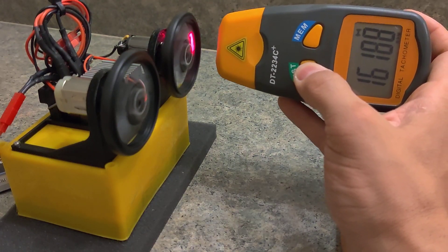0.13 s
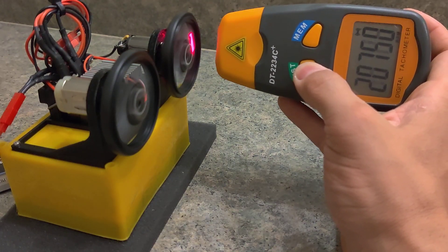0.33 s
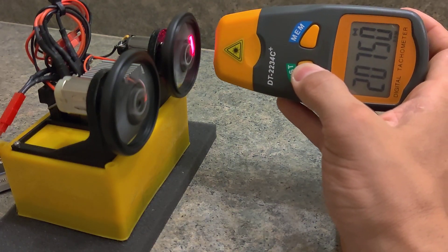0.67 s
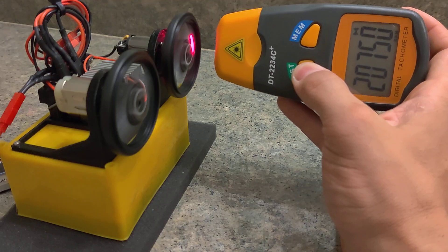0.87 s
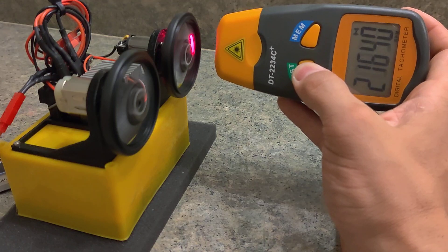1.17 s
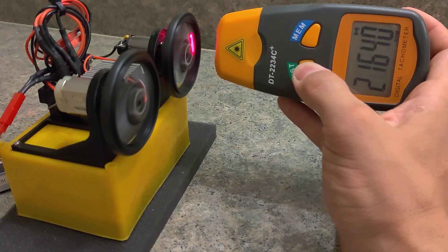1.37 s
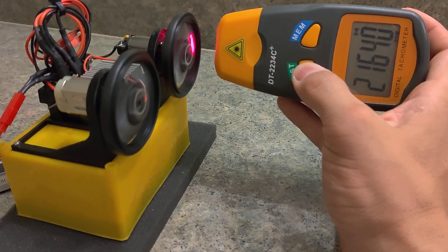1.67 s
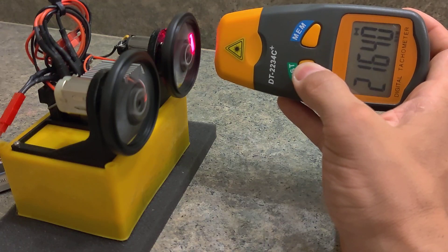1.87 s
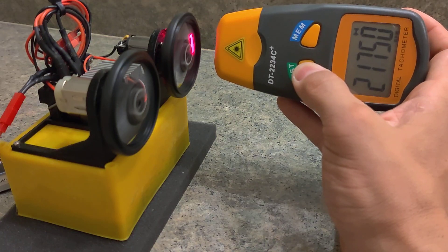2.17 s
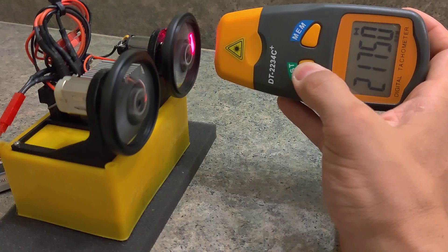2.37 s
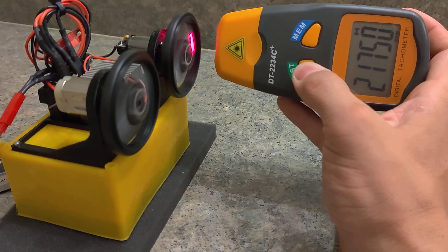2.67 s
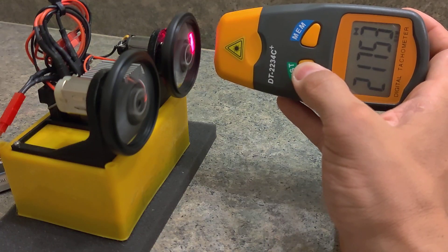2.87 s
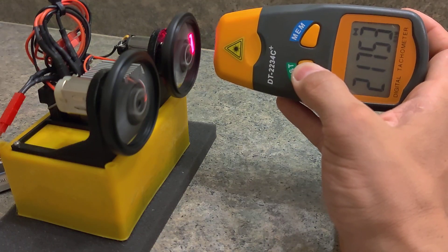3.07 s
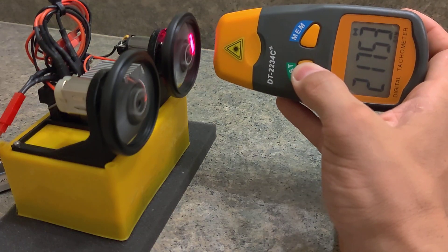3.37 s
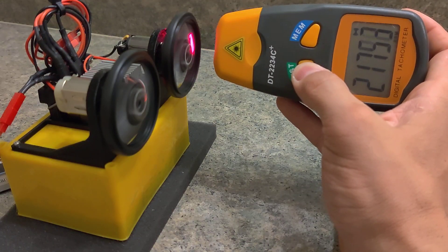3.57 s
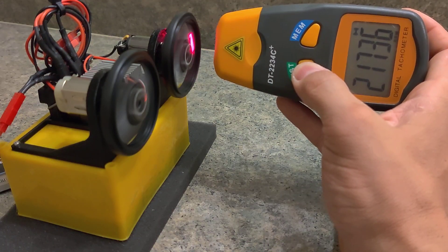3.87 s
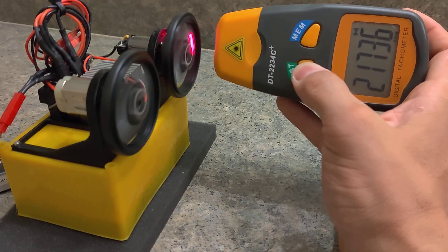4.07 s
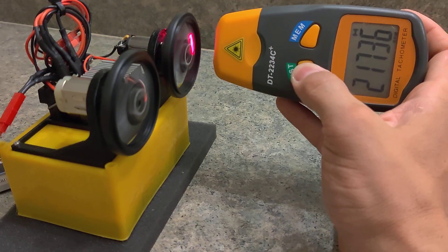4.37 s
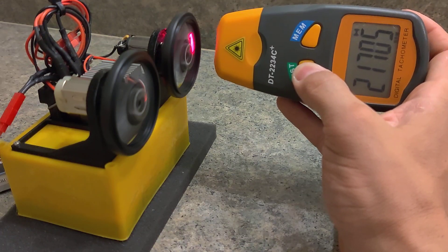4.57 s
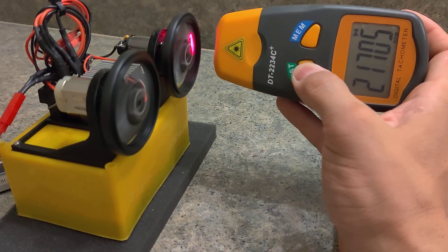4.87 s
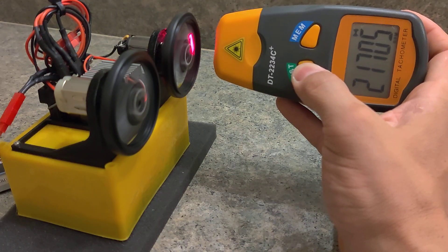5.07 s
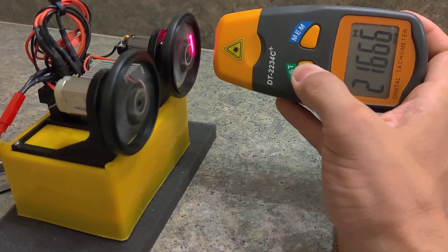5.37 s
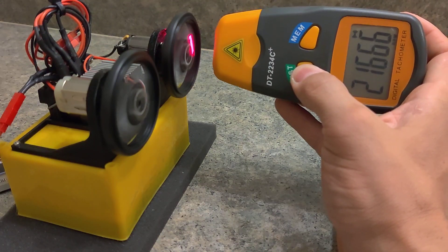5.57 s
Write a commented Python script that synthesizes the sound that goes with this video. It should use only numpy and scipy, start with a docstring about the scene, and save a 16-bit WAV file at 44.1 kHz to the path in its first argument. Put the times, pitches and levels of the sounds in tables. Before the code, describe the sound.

Close stereo microphones on a test bench pick up continuous high-speed spinning: a nasal, buzzing motor hum with fluttering overtones, gentle pulsing and a wide sandy hiss. It settles upward by about half a semitone at the start, then runs evenly for several seconds. Just before the end the motor is released, and the tone starts gliding down and weakening. There is little sense of room echo.

```python
"""Two flywheels on a plastic stand, spun by a small brushed motor at about 360 turns a second, then coasting down.
The unbalanced shaft sings at multiples (orders) of the turning rate, as a sum of cosines.
A second, slower rotation, perhaps the other wheel, beats with them and adds sum and difference tones.
Brushes and bearings hiss and the wheels stir the air, both as shaped noise; a close microphone pair hears it."""
import sys
import numpy as np
from scipy import signal
from scipy.fft import rfft, irfft
from scipy.io import wavfile

SR = 44100
rng = np.random.default_rng(int(sys.argv[2]) if len(sys.argv) > 2 else 0)


def bounce(signal):
    """Save signal as a 16-bit WAV file at the path given by the first command-line argument."""
    frames = np.transpose(np.atleast_2d(signal))
    limited = np.clip(frames, -1, 1)
    pcm = np.round(limited * 32767).astype(np.int16)
    wavfile.write(sys.argv[1], SR, pcm)


N = 252252
T = np.arange(N) / SR
HZ = np.fft.rfftfreq(N, 1 / SR)
EDGE_HZ = 15550  # upper band limit
# the motor closes in on its top speed (turns per second), then sags a little as it runs
TOP_HZ, START_HZ, SPIN_UP_S = 362.7, 350.1, .39
SAG_FROM_S, SAG_HZ_PER_S = 2.7, .74
# switched off, the shaft loses the same share of its speed in every moment
OFF_S, COAST_S = 5.39, 1.48
# once off, the pull on the shaft eases to this share within this time
COAST_PULL, RELEASE_S = .84, .13
# slower rotation, cycles per shaft turn: base value, extra at the start, rise per second during the sag
SLOWER_RATIO, SLOWER_START, SLOWER_CREEP_PER_S = .541, .006, .0022
# levels of the shaft's first four orders and of the slower rotation, away from any resonance
ORDER_DB, SLOWER_DB = [-21.5, -30.5, -40, -41.5], -40.7
# the whine swells gently a few times a second; one crest falls at the given time
THROB_HZ, THROB_CREST_S, THROB_DB = 3.41, 2.22, .68
RING_UP_S = .025  # delay of the resonances behind the pitch
# combination tones: initial shortfall, its decay time, and change of level with no pull at all
BUILD_DB, BUILD_S, UNLOADED_DB = 2, .88, -27


def amp(db):
    """Logarithmic level: decibels to amplitude gain."""
    return 10 ** (np.asarray(db) / 20)


def read(rows, hz):
    """Logarithmic frequency scale: all columns of a table, interpolated along it."""
    f, *columns = np.transpose(rows)
    return np.array([np.interp(np.log(hz + 1), np.log(f + 1), c) for c in columns])


def wander(rate_hz):
    """Low-passed random process of rms 1, with little motion above the given rate."""
    size = 2048
    hz = np.fft.rfftfreq(size, T[-1] / size)
    slow = irfft(rfft(rng.standard_normal(size)) / (1 + (hz / rate_hz) ** 2))
    return np.interp(T, np.linspace(0, T[-1], size), slow / slow.std())


def pair(angle, level, balance_db, lead):
    """Level and phase differences: the left is louder by balance_db and leads by lead radians."""
    left = amp(balance_db / 2) * np.cos(angle + lead / 2)
    right = amp(-balance_db / 2) * np.cos(angle - lead / 2)
    return np.sqrt(2) * level * np.array([left, right])  # level is rms


def shaft_speed():
    """Exponential approach and decay: turns per second in spin-up, slow sag and free coast."""
    spin_up = TOP_HZ - (TOP_HZ - START_HZ) * np.exp(-T / SPIN_UP_S)
    driven = spin_up - SAG_HZ_PER_S * np.maximum(T - SAG_FROM_S, 0)
    return driven * np.exp(-np.maximum(T - OFF_S, 0) / COAST_S)


def slower_ratio():
    """Frequency ratio of the slower rotation to the shaft; its drift changes the pace of the beating."""
    creep = SLOWER_CREEP_PER_S * np.maximum(T - SAG_FROM_S, 0)
    return SLOWER_RATIO + SLOWER_START * np.exp(-T / SPIN_UP_S) + creep


# Peaks and dips of stand and room: centre f/Hz, Gaussian half width f/Hz, level/dB
RESONANCES = [(160, 18, 9), (305, 22, -2.3), (333, 3, -4), (346, 6.3, 5), (357, 2, -2), (360, 1.7, -6.3),
              (640, 14, -3), (709, 40, 4.8), (720, 7, 4.3), (922, 70, 12), (1083, 9, 4.5), (1200, 90, 5),
              (1437, 4, 4)]


def resonance(hz):
    """Resonant transfer: stand and room lift or swallow a tone gliding along this pitch curve."""
    hz = np.interp(T - RING_UP_S, T, hz)
    return amp(sum(db * np.exp(-((hz - centre) / width) ** 2) for centre, width, db in RESONANCES))


def shaft(angle, slower_angle, speed, power):
    """Rotating unbalance: harmonic orders and the slower rotation, swelling where they meet a resonance."""
    throb = amp(THROB_DB * np.cos(2 * np.pi * THROB_HZ * (T - THROB_CREST_S)))
    first, second, third, fourth = (amp(db) * resonance(order * speed) * throb
                                    for order, db in enumerate(ORDER_DB, 1))
    low = amp(SLOWER_DB) * resonance(SLOWER_RATIO * speed)
    # each order has its own jitter of phase (except the first) and of level
    out = pair(angle, first * amp(.29 * wander(35)), balance_db=1 + 4.8 * power, lead=0)
    second_angle = 2 * angle + np.pi / 2 + .028 * wander(25)
    out += pair(second_angle, second * amp(.35 * wander(22)), balance_db=4.0, lead=.3)
    third_angle = 3 * angle + .12 * wander(15)
    out += pair(third_angle, third * amp(2.2 * wander(7.7)), balance_db=-5.5, lead=2.1)
    fourth_angle = 4 * angle + .12 * wander(15)
    out += pair(fourth_angle, fourth * amp(1.5 * wander(14)), balance_db=-1.0, lead=.47)
    return out + pair(slower_angle, low * amp(.84 * wander(14)), balance_db=-1.1, lead=.56)


# Combination tones at shaft order x shaft rate + slower order x slower rate,
# levels under full pull once built up:
# shaft order, slower order, left level/dB, right level/dB, phase lead of the left/rad
PARTIALS = [(1, -1, -48.4, -50.3, -0.1), (0, 2, -40.2, -44.5, 0.4), (2, -1, -44.4, -49.8, 2.4),
            (1, 1, -43.4, -40.4, -2.0), (0, 3, -37.7, -37.1, 0.3), (1, 2, -30.1, -29.9, -0.1),
            (3, -1, -41.0, -37.6, 0.2), (2, 1, -35.8, -43.1, 1.1), (1, 3, -41.5, -40.9, 0.5),
            (4, -2, -44.4, -40.6, 0.7), (4, -1, -46.0, -49.9, 1.1), (3, 1, -49.3, -38.9, 0.5),
            (5, -1, -47.2, -48.8, 1.8), (4, 1, -46.7, -41.5, 3.0), (5, 0, -39.6, -44.3, 2.8),
            (4, 2, -41.6, -43.3, -0.8), (6, -1, -38.7, -40.5, 2.7), (5, 1, -35.1, -34.7, 2.6),
            (6, 0, -39.8, -47.4, 2.3), (6, 1, -44.1, -41.0, -1.3), (5, 3, -42.6, -43.8, -1.7),
            (7, 0, -43.2, -41.6, -2.6), (8, 1, -43.2, -40.5, 2.4), (9, 0, -44.0, -38.6, 2.7),
            (9, 1, -42.4, -46.1, 1.1), (10, 0, -40.7, -46.8, -1.1), (10, 1, -38.7, -39.7, 2.2),
            (13, -2, -40.2, -43.7, -1.2)]


def combination_tones(angle, slower_angle, power):
    """Intermodulation: sums and differences of the two rotations flutter and weaken with the pull."""
    out = np.zeros((2, N))
    for shaft_order, slower_order, left_db, right_db, lead in PARTIALS:
        start = rng.uniform(0, 2 * np.pi)
        phase = shaft_order * angle + slower_order * slower_angle + start + .066 * wander(15)
        level = amp((left_db + right_db) / 2 + .85 * wander(13))
        out += pair(phase, level, left_db - right_db, lead)
    return out * amp(UNLOADED_DB * (1 - power) - BUILD_DB * np.exp(-T / BUILD_S))


# Likeness of the noise at the two sides: f/Hz, correlation coefficient
LIKENESS = [(20, .3), (120, 0.93), (530, 0.88), (800, 0.94), (1300, -0.24), (5000, 0.0044)]


def noise_pair():
    """Partial coherence: spectra of two white noises, alike to a degree set by frequency."""
    left, other = rfft(rng.standard_normal((2, N)))
    same = np.clip(read(LIKENESS, HZ)[0], -1, 1)
    return np.array([left, same * left + np.sqrt(1 - same ** 2) * other])


def treble_share():
    """Power-complementary crossover: the share of power that goes to the hiss, the rest to the air."""
    return 1 / (1 + (1550 / (HZ + 1)) ** 12)


# Air stirred by the wheels, its level at each pitch, before flutter and speed scaling:
# f/Hz, left level/dB per Hz, right level/dB per Hz
AIR = [(20, -66, -70), (70, -70.5, -73), (128, -71, -66), (284, -69.5, -76.5), (364, -59.5, -72),
       (450, -70, -69), (498, -68, -69), (543, -58.5, -68), (714, -64, -54.5), (804, -56, -52.5),
       (970, -57.5, -55.5), (1210, -62, -63), (1520, -70.5, -71.5)]


def stirred_air(noise, relative_speed):
    """Turbulence noise: broadband flow sound that sinks as the wheels slow."""
    spectrum = noise * amp(read(AIR, HZ)) * np.sqrt(1 - treble_share())
    return irfft(spectrum, N) * amp(.73 * wander(11)) * relative_speed ** .36


def scrape(angle, slower_angle):
    """Cyclic roughness under the brushes, repeated each turn, with sidebands at the slower rate."""
    size = 4096  # points around one turn
    orders = np.arange(size // 2 + 1)
    heard = (orders >= 4) & (orders <= 40)
    place = (angle / (2 * np.pi) * size).astype(int) % size
    out = np.zeros((2, N))
    for side in range(-3, 4):  # sideband number
        a, b = rng.standard_normal((2, 2, len(orders)))
        track = np.fft.ifft((a + 1j * b) * heard / (1 + (orders / 17) ** 2), size)
        turn = np.exp(1j * (side * slower_angle + .76 * wander(6.9)))
        out += (track[:, place] * turn).real
    return out / out.std()


# Spectral shape of brushes and bearings, applied to noise and scrape alike:
# f/Hz, left level/dB per Hz, right level/dB per Hz
HISS = [(1630, -56.5, -57.5), (2520, -55.5, -57), (2780, -52, -55.5), (3350, -55, -55), (4600, -54, -53),
        (5820, -51.5, -50.0), (6100, -52, -49), (7250, -58, -55), (7920, -63.5, -60.5), (9280, -56.5, -63),
        (9650, -65, -65.5), (11700, -59, -62), (13600, -59, -59), (14000, -65, -64.5)]


def friction_hiss(noise, angle, slower_angle, relative_speed):
    """Sliding friction: noise and scrape, modulated by contact pressure, sinking as the shaft slows."""
    source = noise * amp(-.62) + amp(-14.5) * rfft(scrape(angle, slower_angle))
    grit = source * amp(read(HISS, HZ)) * np.sqrt(treble_share())
    # the contact keeps shifting, so each region of the hiss flickers on its own
    edges = np.append(np.linspace(0, EDGE_HZ, 9), SR)
    hiss = np.zeros((2, N))
    for lo, hi in zip(edges, edges[1:]):
        hiss += irfft(grit * (HZ >= lo) * (HZ < hi), N) * amp(.94 * wander(20))
    # contact pressure swings with both rotations and their sum, and drifts
    swing = .018 * np.cos(slower_angle) + .015 * np.cos(angle) + .018 * np.cos(angle + slower_angle)
    return hiss * (1 + swing) * amp(.2 * wander(23)) * relative_speed ** .89


def rush(angle, slower_angle, speed):
    """Superposition of stirred air and friction hiss, grown from one noise pair."""
    noise = noise_pair()
    relative_speed = speed / speed.max()
    air = stirred_air(noise, relative_speed)
    hiss = friction_hiss(noise, angle, slower_angle, relative_speed)
    return np.sqrt(SR / 2) * (hiss + air)  # level per Hz to sample amplitude


def scene():
    """Phase as the integral of frequency: one shaft speed sets the pace of everything that turns."""
    speed = shaft_speed()
    power = 1 - (1 - COAST_PULL) * np.clip((T - OFF_S) / RELEASE_S, 0, 1)
    angle = 2 * np.pi * np.cumsum(speed) / SR
    slower_angle = 2 * np.pi * np.cumsum(slower_ratio() * speed) / SR + .06 * wander(12)
    tones = shaft(angle, slower_angle, speed, power) + combination_tones(angle, slower_angle, power)
    return tones + rush(angle, slower_angle, speed)


def record(dry):
    """Linear-phase low-pass filtering: the upper band limit."""
    low_pass = signal.firwin(511, EDGE_HZ, window=("kaiser", 9), fs=SR)
    return signal.oaconvolve(dry, low_pass[None], "same")


dry = scene()
out = record(dry)
bounce(out)
```